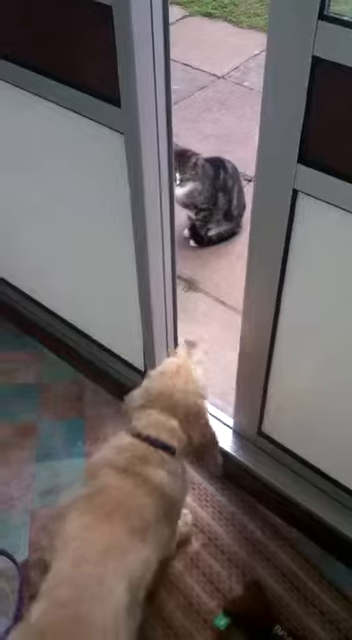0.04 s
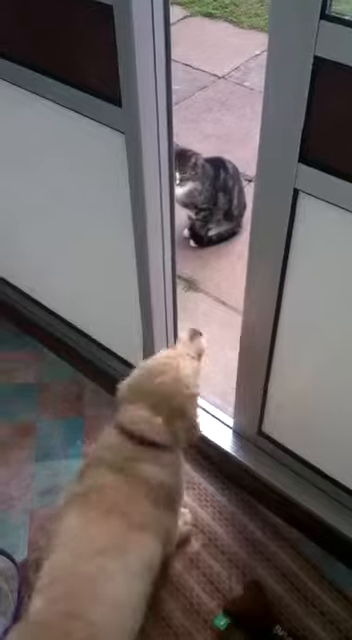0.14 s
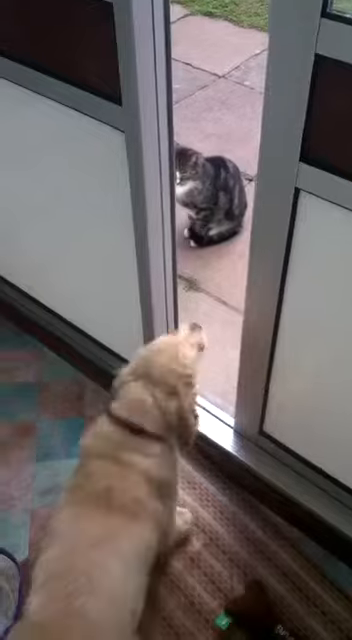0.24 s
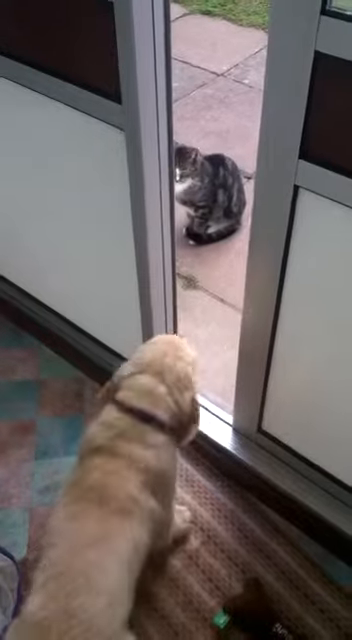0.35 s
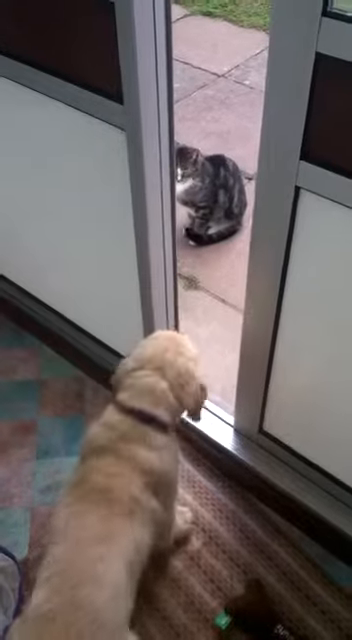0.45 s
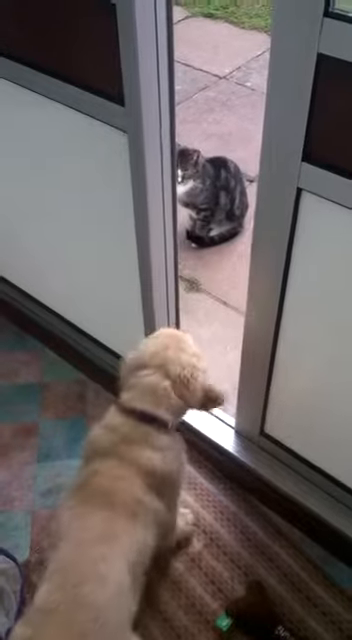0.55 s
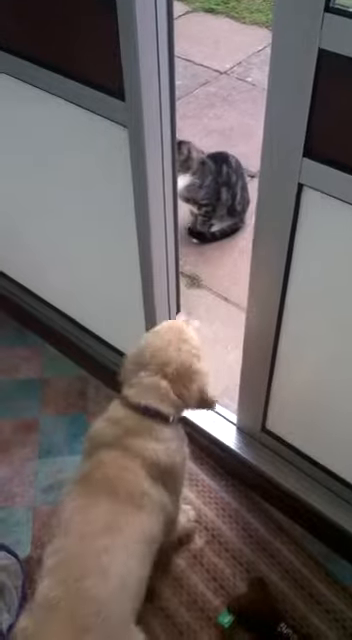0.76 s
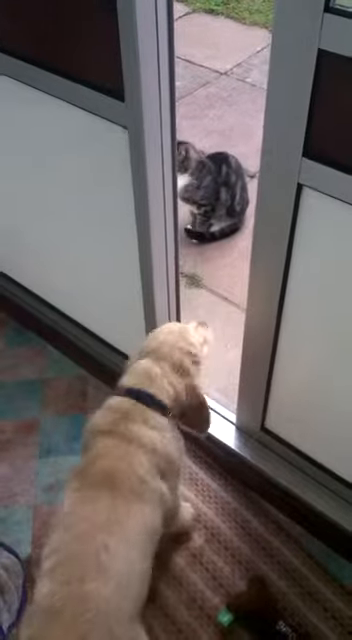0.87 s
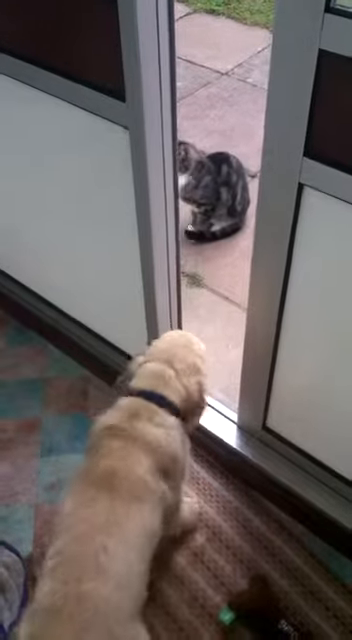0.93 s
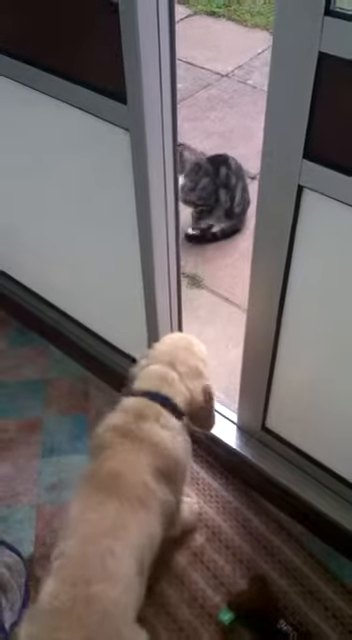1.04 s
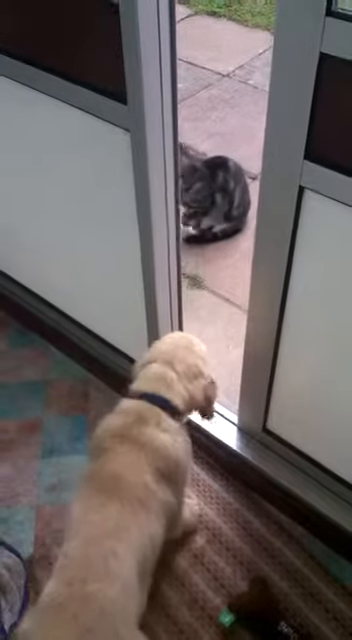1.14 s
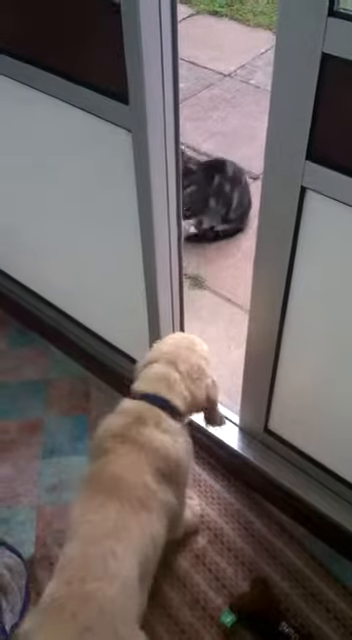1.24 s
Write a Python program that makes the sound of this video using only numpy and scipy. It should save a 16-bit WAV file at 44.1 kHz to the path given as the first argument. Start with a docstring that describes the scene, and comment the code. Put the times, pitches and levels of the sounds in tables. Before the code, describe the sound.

A puppy gives two loud, short barks about two thirds of a second apart, each starting as a clear yelp and turning hoarse; small room with brief ringing, close stereo microphone, very quiet hum between.

```python
"""In a small room, a puppy barks twice at a door that stands ajar, over a soft hum and hiss.
Each bark starts as a clear yelp made of sine overtones, then half-pitch lines and noisy rasp break in.
Short gruff puffs of filtered noise join as the jaw works and shuts, and a soft one comes before the barks.
Fading noise makes the room's ringing, and the last of an earlier bark is still dying away at the start.
A noise suppressor turns the sound down in the pauses."""
import sys
import numpy as np
from scipy import signal
from scipy.fft import rfft, irfft
from scipy.io import wavfile
from scipy.ndimage import uniform_filter1d

SR = 44100
rng = np.random.default_rng(int(sys.argv[2]) if len(sys.argv) > 2 else 0)


def pcm_store(signal):
    """Save signal as 16-bit PCM."""
    levels = np.round(np.clip(np.atleast_2d(signal), -1, 1) * 32767)
    wavfile.write(sys.argv[1], SR, levels.astype(np.int16).T)


N = 57330  # samples, 1.3 s

# how strongly the throat and mouth pass each frequency: (frequency [Hz], level [dB])
THROAT_CURVE = [(100, -39), (280, -29), (450, -15.5), (660, -2), (880, -4.5), (1150, 1), (1420, -5),
                (1660, 1), (1850, -12), (2030, -7), (2300, -18), (2650, -16), (2950, -19.5), (3350, -12),
                (3850, -32.5), (4200, -23.5), (4650, -36.5), (5200, -24.5), (7000, -35), (12000, -55)]
# how long the room takes to fade by 60 dB: (frequency [Hz], fade time [s])
ROOM_FADE = [(150, 0.42), (500, 0.42), (1500, .41), (3500, 0.34), (8000, 0.38), (14000, 0.56)]


def undb(db):
    """Turn decibels into a gain."""
    return 10 ** (np.asarray(db) / 20)


def unit(x):
    """Scale a sound so that its average strength (rms) is 1."""
    return x / np.sqrt(np.mean(x ** 2) + 1e-20)


def lookup(hz, points):
    """Read a curve of (frequency [Hz], value) points, spacing the frequencies as the ear does, by ratio."""
    frequencies, values = np.array(points, float).T
    return np.interp(np.log(np.maximum(hz, 1)), np.log(frequencies), values)


def colour(x, points):
    """Make some frequencies louder than others, following a curve of (frequency [Hz], level [dB])."""
    hz = np.fft.rfftfreq(N, 1 / SR)
    return irfft(rfft(x) * undb(lookup(hz, points)), N)


def resonance(hz, centre_hz, width_hz):
    """A hollow space passes its own frequency best: gain 1 there, less on either side."""
    detuning = (hz ** 2 - centre_hz ** 2) / (np.maximum(hz, 1) * width_hz)
    return 1 / np.sqrt(1 + detuning ** 2)


def walk(rate):
    """Random wander of rms 1: straight lines between random values, `rate` of them a second."""
    steps = rng.standard_normal(4096)
    return unit(np.interp(np.arange(N) / SR * rate, np.arange(4096), steps))


def stereo_noise():
    """Noise from all around reaches two microphones: much alike in the bass, unrelated in the treble."""
    likeness_hz = 600  # the likeness falls away around here
    hz = np.fft.rfftfreq(N, 1 / SR)
    alike = .85 / (1 + (hz / likeness_hz) ** 6)
    mid, side = rfft(rng.standard_normal((2, N)))
    mid = mid * np.sqrt(1 + alike)
    side = side * np.sqrt(1 - alike)
    return unit(irfft(np.array([mid + side, mid - side]), N))


def background(t):
    """Mains hum, a sine of slowly wandering loudness, over the soft noise of the house."""
    # tone colour of the house noise: (frequency [Hz], level [dB])
    house_curve = [(25, -0.5), (60, -1.5), (150, 4), (300, -2.5), (600, -9), (1500, -6.5), (4500, -12),
                   (6500, -17.5), (8000, -6), (11000, -20.5), (15500, -20.5)]
    house_db, hum_hz, hum_db = -58, 100.3, -59.5  # levels ahead of the suppressor
    hum = np.sqrt(2) * np.sin(2 * np.pi * hum_hz * t) * undb(hum_db + walk(1.7))
    return hum + undb(house_db) * unit(colour(stereo_noise(), house_curve))


def lingering(t):
    """The last of an earlier bark: throat-coloured noise dies away at the room's fading rate."""
    start_db = -53
    fade_s = lookup(1000, ROOM_FADE)
    return undb(start_db - 60 * t / fade_s) * unit(colour(stereo_noise(), THROAT_CURVE))


def grunt(t, at, length, db, hz):
    """A short puff of air sounds through one resonance of the mouth: noise that swells and dies."""
    width_hz = .35 * hz
    shape = resonance(np.fft.rfftfreq(N, 1 / SR), hz, width_hz) ** 2
    air = unit(irfft(rfft(rng.standard_normal(N)) * shape, N))
    swell = np.exp(-.5 * ((t - at) / length) ** 2)
    return undb(db) * swell * air


def vocal_folds(hz, phase, slope):
    """Vibrating folds give overtones of the pitch, and lines halfway between when cycles pair up."""
    split_hz, split_width_hz = 1670, 230  # mouth resonance that carries the half-pitch lines
    tone, split = 0, 0
    for k in np.arange(1, 10):
        tone_db = lookup(k * hz, THROAT_CURVE) + slope * np.log2(k)
        tone = tone + undb(tone_db) * np.sin(k * phase)
        half = k - .5
        split_gain = undb(lookup(half * hz, THROAT_CURVE)) * resonance(half * hz, split_hz, split_width_hz)
        split = split + split_gain * np.sin(half * phase)
    return tone, split


def throat_rasp(puffs):
    """Rough air in the throat: noise in puffs, coloured by throat and mouth."""
    return unit(colour(puffs * rng.standard_normal(N), THROAT_CURVE))


def teeth_hiss(puffs, t):
    """Air hisses through the teeth, and the hiss bounces off the door frame and sill."""
    # how well the gaps between the teeth pass each frequency: (frequency [Hz], level [dB])
    teeth_curve = [(3500, -32), (5800, -18.5), (6500, -7), (7000, -12), (8100, 0.5), (9000, -9),
                   (10000, -16), (11300, -20), (12100, -36.5), (13500, -29), (15000, -59.5)]
    # echoes off door frame and sill: (delay [s], level [dB])
    bounces = [(.00162, -11), (.00265, -11)]
    hiss = puffs * rng.standard_normal(N)
    echoes = sum(undb(db) * np.interp(t - delay, t, hiss) for delay, db in bounces)
    return unit(colour(hiss + echoes, teeth_curve))


def bark(rows, t):
    """Jittery vocal folds sound the yelp and half-pitch lines; air adds rasp and hiss."""
    jitter, jitter_rate = .036, 240  # pitch wobble as a fraction, new values per second
    shimmer_db, shimmer_rate = 2.8, 200  # loudness wobble, new values per second
    pulsing = 0.71  # depth of the puffs, one for every two cycles of the folds
    hiss_db = -11  # hiss relative to the rasp, at full air speed
    hiss_onset_db = -28  # below this rasp level the air is too slow to hiss fully

    times, pitch, *levels, slopes = np.array(rows, float).T
    fade_in = np.clip((t - times[0]) / .004 + 1, 0, 1)
    fade_out = np.clip((times[-1] - t) / 0.0061 + 1, 0, 1)
    edge = fade_in * fade_out
    tone_level, split_level, rasp_level = (edge * undb(np.interp(t, times, db)) for db in levels)

    hz = np.interp(t, times, pitch) * (1 + jitter * walk(jitter_rate))
    phase = 2 * np.pi * np.cumsum(hz) / SR
    tone, split = vocal_folds(hz, phase, np.interp(t, times, slopes))
    puffs = 1 + pulsing * np.cos(phase / 2)
    rasp = throat_rasp(puffs)
    hiss = teeth_hiss(puffs, t)

    shimmer = undb(shimmer_db * walk(shimmer_rate))
    voice = shimmer * (tone_level * tone + split_level * split + rasp_level * rasp)
    air_speed = np.minimum(rasp_level / undb(hiss_onset_db), 1)
    return voice, shimmer * rasp_level * undb(hiss_db) * hiss * air_speed


def room(t):
    """What a click becomes at both microphones: itself, a burst off door and floor, a fading tail."""
    tail_db, early_db, direct_db = -6, -2, -2  # mixing levels, before the evening-out
    early_s = 0.0082  # time for the burst to fall to about a third
    right_lag_s = 0.000094  # the direct sound reaches the right microphone later
    hz = np.fft.rfftfreq(N, 1 / SR)
    noise = rfft(stereo_noise())
    tail = 0
    for k, (_, fade_s) in enumerate(ROOM_FADE):
        # each band blends into its neighbours and fades at its own speed
        share = lookup(hz, [(f, j == k) for j, (f, _) in enumerate(ROOM_FADE)])
        tail = tail + irfft(noise * share, N) * undb(-60 * t / fade_s)
    tail = tail * np.clip(t / 0.01, 0, 1)
    early = stereo_noise() * np.exp(-t / early_s) * (t > .002)
    response = (undb(tail_db) * unit(tail) + undb(early_db) * unit(early)) / np.sqrt(N)
    # the sinc is a click placed between two samples
    direct = np.array([t == 0, np.sinc((t - right_lag_s) * SR) * (t < .001)])
    return response + undb(direct_db) * direct


def even(response):
    """Level out the broad humps of a room response and keep its fine ripple."""
    even_hz = 90  # width of the averaging
    spectrum = rfft(response)
    power = uniform_filter1d(np.abs(spectrum) ** 2, int(even_hz * N / SR), axis=1)
    return irfft(spectrum * np.sqrt(power.mean() / power), N)[:, :N // 2]


def scene():
    """The puppy's sounds ring in the room, over the lingering bark and the background."""
    # how each bark unfolds: (time [s], pitch [Hz], clear tone [dB], half-pitch lines [dB], rasp [dB],
    # overtone slope [dB per octave])
    first_bark = [(.194, 449.8, -41.5, -79, -61, -10), (.207, 529.5, -21.5, -69.5, -40, -20),
                  (.219, 636.6, -22, -64.5, -29.5, -4.5), (.238, 634.6, -17, -40, -28, 1),
                  (.25, 671.8, -5, -49, -16.5, -2), (.276, 643.4, -8.5, -11.5, -19.5, -11.5),
                  (.305, 643, -27.5, -18.5, -18.5, -5.5), (.336, 633.4, -28.5, -9.5, -23, -6.5),
                  (.354, 601, -29, -35, -29.5, 0), (.392, 508.5, -32, -60, -28.5, -16)]
    second_bark = [(.846, 630.6, -34.5, -80, -67.5, -12), (.858, 660, -33, -68.5, -45.5, -5),
                   (.868, 745.7, -11.5, -64, -37, -21.5), (.879, 717.7, -14, -41, -30, -1),
                   (.889, 697.5, -6, -70, -24.5, -1.5), (.912, 690.7, -10.5, -15, -24.5, -2),
                   (.942, 677.4, -19.5, -13.5, -22.5, -0.5), (.98, 661.3, -19, -7.5, -26, -11.5),
                   (.998, 655.4, -28, -19.5, -25, -7), (1.04, 562.5, -53, -40, -41, 3)]
    # gruff puffs as the jaw works and shuts: (time [s], length [s], level [dB], resonance [Hz])
    jaw_puffs = [(0.266, 0.019, -41.5, 326.3), (0.335, 0.024, -21, 1083), (0.362, 0.021, -38.5, 265.3),
                 (0.37, .014, -26.5, 560), (1.006, 0.0091, -26, 980), (1.029, 0.012, -41, 386)]
    # one soft gruff sound before the barks: (time [s], length [s], level [dB], resonance [Hz])
    mutter = (.02, .008, -49, 570)
    voice_right_db, hiss_right_db = 1, 12.5  # how much louder each is sent to the right than to the left
    t = np.arange(N) / SR
    voice, hiss = np.add(bark(first_bark, t), bark(second_bark, t))
    voice = voice + sum(grunt(t, *row) for row in jaw_puffs) + grunt(t, *mutter)
    side = np.array([[-.5], [.5]])  # left, right
    dog = voice * undb(side * voice_right_db) + hiss * undb(side * hiss_right_db)
    ringing = signal.fftconvolve(dog, even(room(t)), axes=1)[:, :N]
    return ringing + lingering(t) + background(t)


def record(dry):
    """A suppressor turns quiet stretches down, peaks beyond full scale clip, and the top is cut."""
    quiet_db, knee_db, duck_db = -52, 8, -12  # threshold, width of the changeover, full turn-down
    sense_hz, sense_s = 398, 0.026  # it listens above this frequency, averaging over this time
    top_hz = 15400
    listen = signal.butter(2, sense_hz, "high", fs=SR, output="sos")
    sensed = np.mean(signal.sosfilt(listen, dry) ** 2, axis=0)
    keep = np.exp(-1 / (sense_s * SR))
    # the running average starts at the threshold
    power, _ = signal.lfilter([1 - keep], [1, -keep], sensed, zi=[undb(quiet_db) ** 2])
    level_db = 10 * np.log10(power + 1e-12)
    quiet = np.clip((quiet_db - level_db) / knee_db + .5, 0, 1)
    out = np.clip(dry * undb(duck_db * quiet), -1, 1)
    return signal.sosfilt(signal.ellip(8, .2, 80, top_hz, fs=SR, output="sos"), out)


dry = scene()
out = record(dry)
pcm_store(out)
```